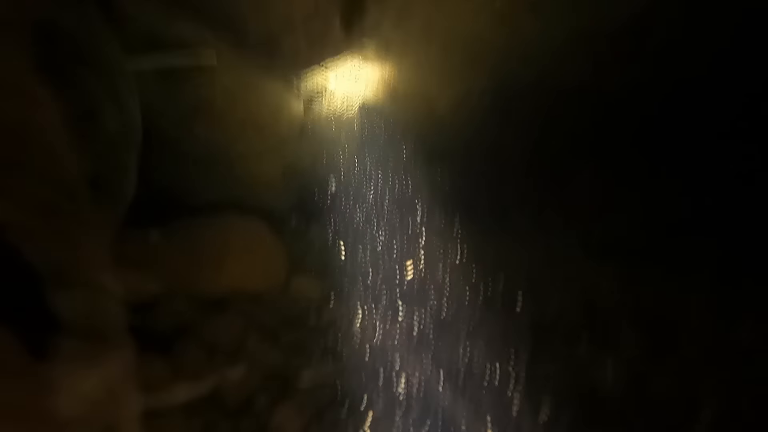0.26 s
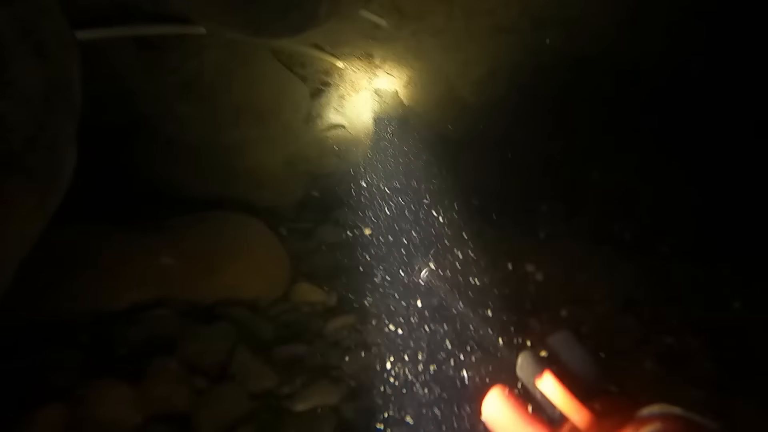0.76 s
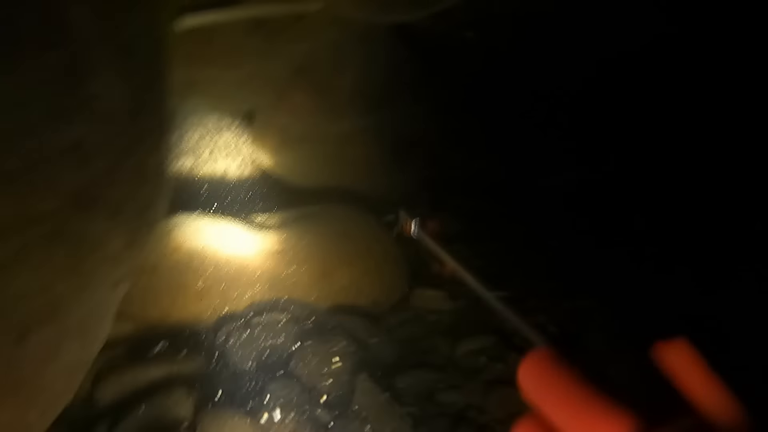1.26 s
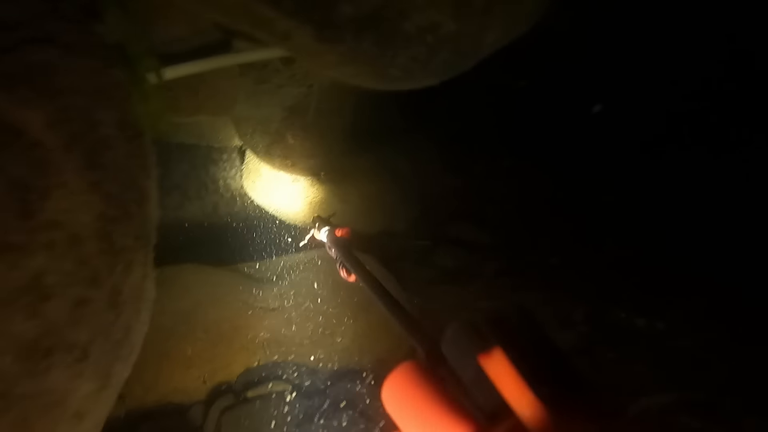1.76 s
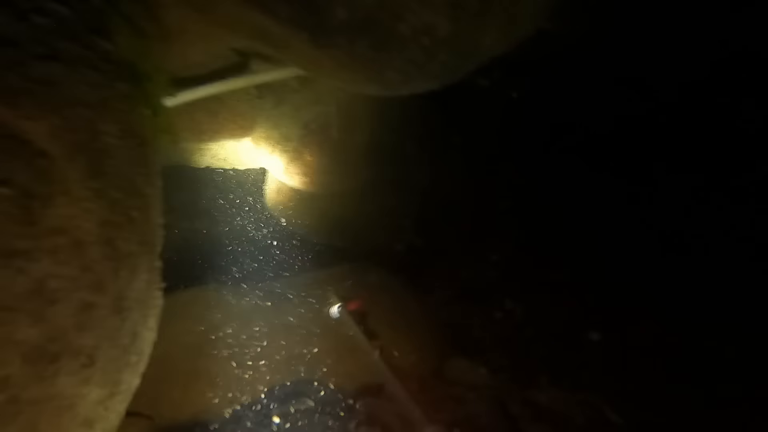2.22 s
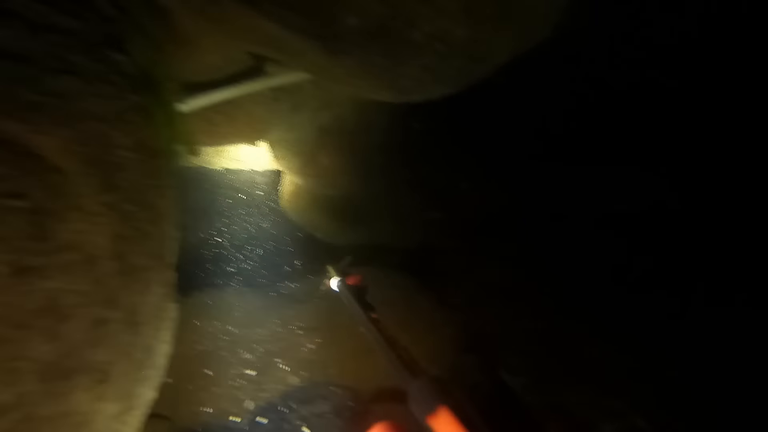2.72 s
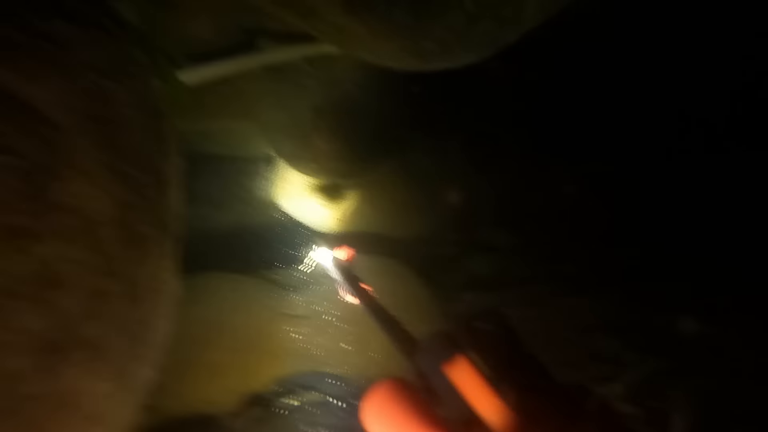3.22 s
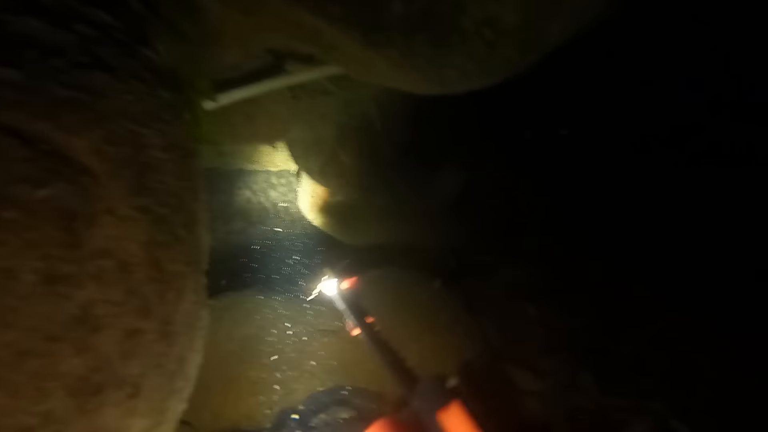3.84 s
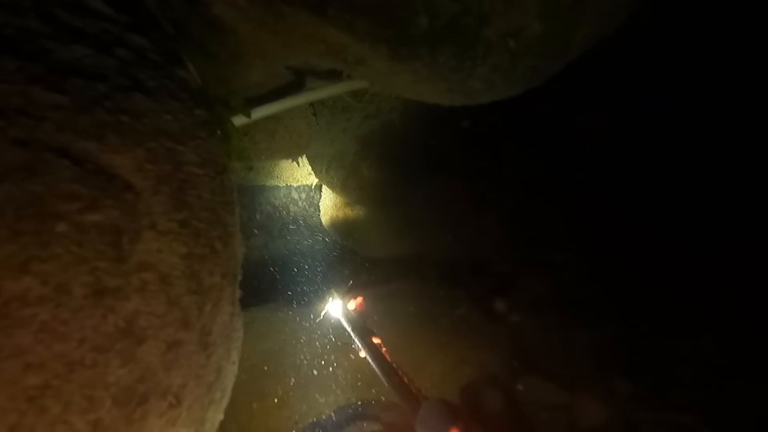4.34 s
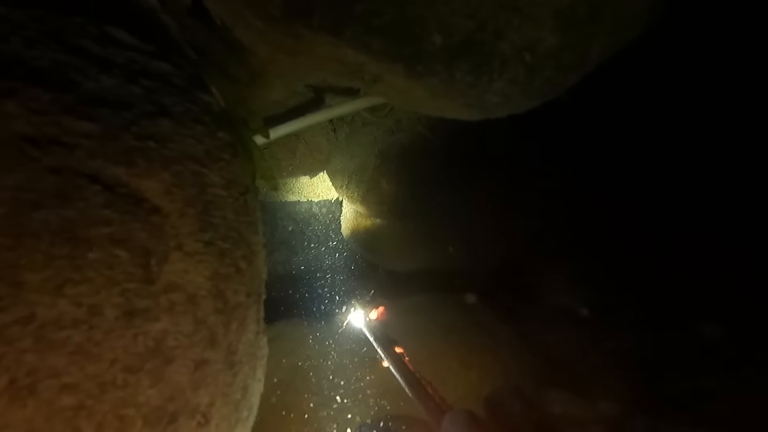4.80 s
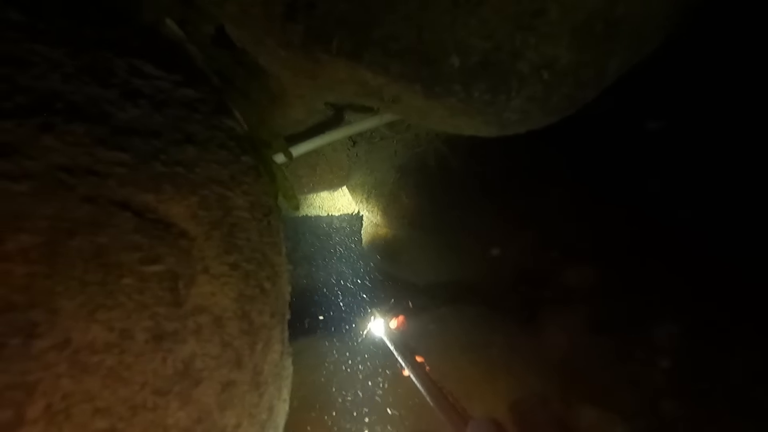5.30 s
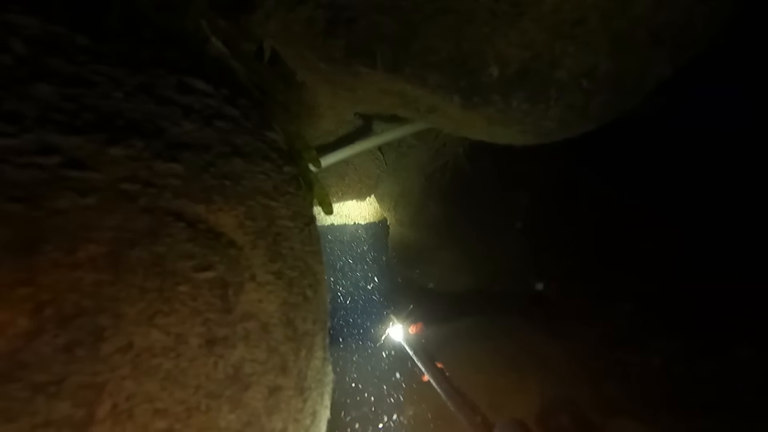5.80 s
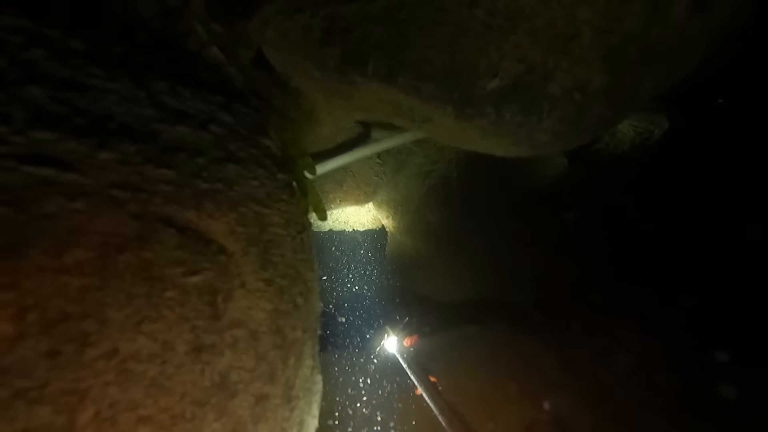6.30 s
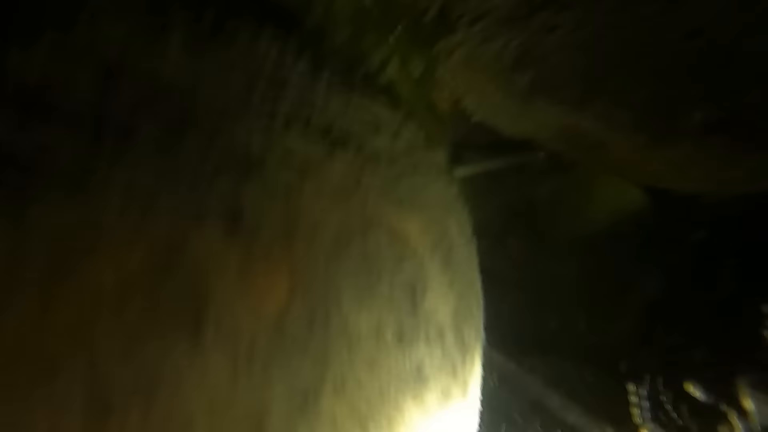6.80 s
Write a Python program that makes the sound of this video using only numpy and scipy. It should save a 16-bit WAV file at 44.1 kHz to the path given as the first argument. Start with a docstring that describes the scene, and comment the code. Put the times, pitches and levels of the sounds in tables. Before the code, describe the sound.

A sealed camera bumps among river boulders underwater: deep surges, thuds and clicks, a quiet stretch with thin high whine, then a loud closing knock.

```python
"""A river current heaves on a sealed camera housing among boulders: a deep rumble, with buffeting, slosh,
gurgle and swish, all made from coloured noise whose level follows tables of moments.
Knocks, grit ticks and a creaking strap are short rough contacts that set the case ringing at a few pitches.
Behind them the camera's circuits whine faintly as wobbling sine tones, over a trace of amplifier hiss."""
import sys
import numpy as np
from scipy import signal
from scipy.fft import rfft, irfft
from scipy.io import wavfile
from scipy.ndimage import uniform_filter1d

SR = 44100
rng = np.random.default_rng(int(sys.argv[2]) if len(sys.argv) > 2 else 0)


def int16_out(signal):
    """Quantize to a 16-bit WAV file."""
    q = np.round(np.clip(np.atleast_2d(signal).T, -1, 1) * 32767)
    wavfile.write(sys.argv[1], SR, q.astype(np.int16))


N = 311257  # length in samples

# All levels in the tables are those before record() drives the mix.

# How hard the river pushes over time: start_s, heave_db, buffet_db, slosh_db
CURRENT = [(0.0, -12, -26.5, -33.5), (0.21, -45, -24.5, -46), (0.31, -15, -32, -32.5),
           (0.43, -40.5, -35.5, -47.5), (0.76, -38.5, -36, -50), (1.16, -24, -30.5, -32.5),
           (2.0, -32.5, -34.5, -49), (2.37, -28, -40.5, -42.5), (2.87, -27.5, -28, -41.5),
           (3.08, -24.5, -30.5, -43), (3.53, -22, -31.5, -41), (3.98, -34, -41.5, -49),
           (4.24, -25.5, -39, -41), (4.55, -30, -43.5, -44), (6.24, -26, -42.5, -44.5),
           (6.77, -30.5, -39.5, -42.5), (6.81, -16.5, -25, -33.5), (7.05, -46, -48.5, -44)]
# Colour of the deep heave: pitch_hz, relative_level_db
HEAVE_COLOUR = [(4.7, -44), (8.0, -6.5), (26, -3), (50, -6), (65, -47), (110, -120)]


def heave():
    """The slow push of the current on the case, heard as a deep rumble."""
    return water(HEAVE_COLOUR, along(CURRENT, 1), size=4096, patchy_db=0, flicker_db=0)


# Colour of the quicker buffeting: pitch_hz, relative_level_db
BUFFET_COLOUR = [(26, -44.5), (45, -4.5), (94, 9), (160, -21.5), (210, -45.5), (350, -120)]
PUSHED_BUFFET_DB = -21  # added to the stir of the surges


def buffet(pushed):
    """Quicker pushes of the current, stronger around each surge."""
    level_db = summed(along(CURRENT, 2), pushed + PUSHED_BUFFET_DB)
    return water(BUFFET_COLOUR, level_db, size=2048, patchy_db=-0.66, flicker_db=2.5)


# Colour of the slosh: pitch_hz, relative_level_db
SLOSH_COLOUR = [(82, -32.5), (140, 9), (249, -8.5), (312, 2.5), (403, -6), (485, -0.5), (545, -7),
                (680, -5.5), (760, -19), (950, -20.5), (1240, -55), (2090, -120)]
STIRRED_SLOSH_DB = -22.5  # added to the stir of the knocks


def slosh(stirred):
    """Water washing round the case with the current, the knocks and the scrapes."""
    level_db = summed(along(CURRENT, 3), stirred + STIRRED_SLOSH_DB, scrapes(column=4))
    return water(SLOSH_COLOUR, level_db, size=1024, patchy_db=1.5, flicker_db=3.0)


GURGLE_UNDER_SLOSH_DB, STIRRED_GURGLE_DB = -19, -50.5


def gurgle_db(stirred):
    """The gurgle follows the current's slosh, the knocks and the scrapes."""
    return summed(along(CURRENT, 3) + GURGLE_UNDER_SLOSH_DB, stirred + STIRRED_GURGLE_DB, scrapes(column=3))


# Colour of the gurgle: pitch_hz, relative_level_db
GURGLE_COLOUR = [(530, -29.5), (900, 2), (994, -6.5), (1350, -1), (1530, -0.5), (2100, -18), (2730, -35),
                 (4620, -120)]


def gurgle(stirred):
    """Water gurgling in the middle pitches, as patchy noise."""
    return water(GURGLE_COLOUR, gurgle_db(stirred), size=512, patchy_db=2.8, flicker_db=2.0)


# Colour of the swish: pitch_hz, relative_level_db
SWISH_COLOUR = [(1180, -37.5), (2000, 1), (2540, 3.5), (3080, -7.5), (4840, -3), (5420, -9), (6360, -12.5),
                (8750, -27.5), (9610, -20), (9800, -24.5), (12700, -45), (21600, -120)]
# The calm swish has SWISH_DB when the whine is at WHINE_FULL_DB, and fades with it by a share.
SWISH_DB, SWISH_SHARE, WHINE_FULL_DB = -64, 0.58, -64
STIRRED_SWISH_DB = -61


def swish(stirred):
    """The bright hiss of moving water and dragged grit."""
    calm_db = SWISH_DB + SWISH_SHARE * (along(WHINE, 2) - WHINE_FULL_DB)
    level_db = summed(calm_db, stirred + STIRRED_SWISH_DB, scrapes(column=2))
    return water(SWISH_COLOUR, level_db, size=256, patchy_db=2.5, flicker_db=1.2)


# Grit and water dragged along the case: middle_s, length_s, swish_db, gurgle_db, slosh_db
# (each end of the length lies 20 dB below the middle)
SCRAPES = [(0.188, .1, -70, -55.5, -28.5), (0.345, 0.052, -51, -32.5, -28.5), (.49, .06, -67, -54.5, -26),
           (0.553, 0.092, -67, -53, -33), (0.767, 0.15, -71, -61.5, -34), (1.068, .06, -62, -51, -30),
           (1.193, 0.17, -67.5, -51.5, -34), (1.355, 0.26, -58, -59.5, -37), (1.447, .06, -66, -51, -25.5),
           (1.691, 0.11, -63, -52, -29.5), (2.097, .1, -82, -58.5, -44.5), (2.319, 0.12, -75, -53.5, -35),
           (2.688, 0.077, -77, -60, -39), (2.87, 0.095, -69, -56, -29), (2.997, 0.11, -57.5, -53, -35),
           (3.23, 0.061, -63, -69.5, -58), (3.448, 0.089, -64.5, -55, -30), (3.988, 0.055, -61, -56, -40),
           (4.66, 0.06, -66, -60, -41), (6.723, 0.043, -66, -54, -37.5), (6.817, 0.066, -42, -35, -19),
           (6.925, 0.086, -60, -44.5, -31)]


def scrapes(column):
    """Level over time of the drags: each one swells and fades like a bell curve."""
    t = np.arange(N) / SR
    return summed(*(row[column] - 20 * ((t - row[0]) / row[1] * 2) ** 2 for row in SCRAPES))


# Each bump's stir rises 60 dB over SWELL_S, then falls 60 dB over SETTLE_S plus a multiple of its t60.
STIR_SHARE, SWELL_S, SETTLE_S, SETTLE_TIMES = 0.55, 0.013, 0.029, 3.3


def stir(bumps):
    """How far bumps (start_s, level_db, t60_s) stir the water round the case, in dB."""
    t = np.arange(0, N + 64, 64) / SR  # coarse steps are enough
    fades = []
    for s, db, t60 in bumps:
        settle_s = SETTLE_S + SETTLE_TIMES * t60
        fades.append(STIR_SHARE * db - 60 * np.maximum((s - t) / SWELL_S, (t - s) / settle_s))
    return np.interp(np.arange(N) / SR, t, summed(*fades))


def water(colour, level_db, size, patchy_db, flicker_db):
    """Coloured noise with drifting patches and a flicker shared by all pitches."""
    frames, hz = 4 * N // size + 5, np.fft.rfftfreq(size, 1 / SR)
    a, b, c, d, patches = rng.standard_normal((frames, len(hz), 5)).T
    patches = uniform_filter1d(patches, size=5, axis=0)  # blur over pitch
    patches = evened(uniform_filter1d(patches, size=6, axis=1))  # blur over time
    flicker = evened(uniform_filter1d(rng.standard_normal(frames), size=3))
    shape_db = read(colour, hz)[:, None] + patchy_db * patches + flicker_db * flicker
    spectra = np.array([a + 1j * b, c + 1j * d]) * gain_of(shape_db)
    one, other = signal.istft(spectra, nperseg=size, noverlap=3 * size // 4)[1][:, :N]
    return gain_of(level_db) * evened(ports(one, other))


# Surges that push on the case: start_s, level_db, pitch_hz, t60_s
THUMPS = [(0.071, -14.5, 117.6, 0.24), (0.26, -4, 46.6, 0.25), (0.791, -8, 83.7, 0.06),
          (0.884, -13, 98.4, 0.059), (1.01, -5.5, 75.6, 0.12), (1.074, -7.5, 70, 0.19),
          (1.266, -5, 97, 0.076), (1.322, -6.5, 90.4, .09), (1.539, -13, 66.1, 0.19),
          (1.655, -8.5, 93.5, 0.1), (1.799, -12, 73.6, 0.11), (1.888, -27, 108, 0.18),
          (2.147, -10, 85.5, 0.083), (2.301, -11.5, 66.2, 0.11), (2.459, -6.5, 75.5, 0.14),
          (2.681, -19.5, 88.2, 0.15), (2.92, -17, 89.4, 0.21), (3.358, -31, 68, 0.45),
          (3.694, -3, 60.4, 0.1), (4.157, -8, 109.2, 0.081), (4.228, -9.5, 73.7, 0.064),
          (4.298, -9, 62.5, 0.12), (6.662, -16, 147.4, 0.089), (6.8, 0.5, 73.7, 0.091)]


def thumps():
    """Each surge of water is one low, softly started, dying tone."""
    out = np.zeros(N)
    for s, db, hz, t60 in THUMPS:
        add(out, s, gain_of(db) * ring(hz, t60, rise=0.27))
    return out


# The pitches at which the case rings: pitch_hz, level_db, t60_s (time to die by 60 dB)
CASE = [(178, -0.5, 0.023), (299.2, -0.5, 0.067), (497, 0.5, 0.046), (658, 1, 0.048), (914, 0, 0.026),
        (1430, 3, 0.01), (1843, 2, 0.011), (2220, 1, 0.007), (3160, 2, 0.0063), (4030, 1, 0.014),
        (4820, 1.5, 0.0083), (6040, -10, 0.0097), (8050, -22, 0.0069)]
# Bumps on the case: start_s, level_db, pitch_hz of the extra ring at the spot struck,
# rap_db (how far the contact shakes pitches near 1500 Hz), contact_t60_s
KNOCKS = [(0.058, -9, 642, -20.5, 0.013), (0.073, -8, 605, -15.5, 0.1), (0.146, -10.5, 330, -19, 0.16),
          (0.17, -20, 325, -32.5, 0.11), (0.201, -17.5, 439, -19.5, 0.03), (0.303, -8.5, 346.5, -22, 0.02),
          (0.373, -9.5, 538, -10, 0.04), (0.378, -18.5, 178, -28, 0.012), (0.466, -12, 350, -9, 0.096),
          (0.543, -20.5, 253.4, -16.5, 0.013), (0.649, -32, 314, -10.5, 0.058),
          (0.672, -25.5, 645, -10.5, 0.16), (0.762, -25, 334, -20, 0.098), (0.892, -20, 255, -21.5, 0.31),
          (0.922, -18.5, 295, -15, 0.037), (1.018, -8.5, 532, -23, 0.11), (1.07, -6.5, 527, -24, 0.072),
          (1.087, -9.5, 322, -20.5, 0.014), (1.129, -12.5, 351, -22.5, 0.084),
          (1.223, -16.5, 364, -5.5, 0.047), (1.273, -11.5, 168, -18, 0.08), (1.284, -10, 327, -24.5, 0.058),
          (1.42, -17.5, 355, -12.5, 0.11), (1.436, -17.5, 329, -35, 0.061),
          (1.529, -17, 242.6, -13.5, 0.22), (1.663, -10.5, 236.5, -37, 0.037),
          (1.802, -30, 512, -27, 0.046), (1.89, -19.5, 653, -25.5, 0.056), (2.154, -31, 313, -29, 0.049),
          (2.303, -27.5, 667, -17, 0.18), (2.34, -22.5, 562, -20.5, 0.038), (2.47, -25, 216, -47, 0.069),
          (2.59, -12, 298, -27.5, 0.13), (2.768, -28.5, 250, -28, 0.044), (2.857, -24.5, 382, -24.5, 0.19),
          (2.923, -8, 257, -25, 0.096), (2.942, -14, 313, -14, 0.099), (2.986, -15.5, 341, -16, 0.025),
          (3.129, -24.5, 310, -32, 0.096), (3.262, -19, 587, -44.5, 0.03), (3.4, -17, 237.4, -62, 0.15),
          (3.449, -19, 298, -17.5, 0.037), (3.506, -27.5, 318, -12, 0.12),
          (3.644, -13, 344.5, -65.5, 0.025), (3.664, -12.5, 346, -40, 0.021),
          (3.696, -5, 340, -49.5, 0.014), (3.82, -18, 364, -34.5, 0.013), (4.095, -30, 300, -13.5, 0.36),
          (4.163, -20, 343, -36, 0.036), (4.239, -29.5, 524, -31, 0.028), (4.635, -27.5, 197, -22, 0.11),
          (5.301, -33.5, 197.4, -30, 0.098), (6.195, -37.5, 500, -42, 0.02),
          (6.671, -17, 206, -48.5, 0.013), (6.775, -3.5, 232, -22.5, 0.06), (6.791, -12, 362, -10.5, 0.048),
          (6.806, 0, 574, 2, 0.11), (6.827, -3.5, 603, -7, 0.014), (6.872, -2, 227.5, -12, 0.029)]


def knocks():
    """The case bumps dully against rock and gear; the spot that is struck favours one pitch."""
    out = np.zeros(N)
    chances = rng.standard_normal((len(KNOCKS), 4096))
    for (s, db, hz, rap_db, t60), chance in zip(KNOCKS, chances):
        hardness = [(np.clip(hz, 400, 700), -6), (1500, rap_db), (3000, rap_db - 23.5)]
        modes = CASE[:8] + [(hz, 6, .04)]
        add(out, s, gain_of(db) * struck(modes, hardness, t60, chance, blow=1.27, rise=0.66))
    return out


# Clear snaps on the case: start_s, level_db, pitch_hz of the extra ring,
# crack_db (how far the contact shakes pitches near 4500 Hz), contact_t60_s
TICKS = [(0.072, -43.5, 1410, -9, 0.019), (0.1277, -40.5, 1340, -7, 0.01), (0.181, -36.5, 1350, -14, 0.02),
         (0.2334, -41, 1340, -9, 0.009), (0.2925, -31.5, 1850, -18, 0.015), (0.3051, -6, 1617, -9.5, 0.013),
         (0.3362, -12.5, 1875, -7, 0.038), (0.3479, -10, 1664, -9.5, 0.016),
         (0.3715, -14, 1740, -17.5, 0.02), (0.4565, -12.5, 1476, -38, 0.0012),
         (0.549, -39.5, 1370, -17, 0.012), (0.762, -50.5, 1400, -8, 0.01), (0.8112, -46, 1330, -2, 0.0091),
         (0.8955, -33, 1790, -9.5, 0.015), (0.9258, -31, 1400, -43.5, 0.0063),
         (1.0189, -22.5, 1380, -53, 0.0063), (1.053, -40.5, 1520, -26, 0.01), (1.067, -37, 1300, -19, 0.01),
         (1.2218, -29.5, 1450, -42, 0.0067), (1.2711, -30, 1640, -31, 0.0088),
         (1.5295, -37, 1505, -32, 0.012), (1.6642, -29, 1360, -44, 0.019), (1.8042, -31, 2430, -22, 0.012),
         (2.306, -35, 3970, -6, 0.0061), (2.9412, -33, 1310, -31, 0.025), (2.9866, -38, 1340, -22, 0.0062),
         (3.0713, -41.5, 1460, -25, 0.012), (3.696, -28.5, 1480, -27.5, 0.012),
         (3.928, -46, 1560, -37, 0.011), (3.9846, -38, 1620, -15.5, 0.028), (4.156, -41, 1540, -10, 0.009),
         (4.2425, -36.5, 1210, -21, 0.011), (4.261, -42.5, 1580, -10, 0.01),
         (5.2984, -44, 1500, -28, 0.014), (6.7748, -19, 2610, -24, 0.0072),
         (6.8091, -2, 1355, -16.5, 0.0096), (6.874, -13, 1454, -21.5, 0.0097),
         (6.94, -30.5, 1430, -20, 0.063)]


def ticks():
    """Grit and buckles snap on the case: short hard contacts that shake its higher pitches."""
    out = np.zeros(N)
    chances = rng.standard_normal((len(TICKS), 4096))
    for (s, db, hz, crack_db, t60), chance in zip(TICKS, chances):
        hardness = [(700, -24), (1400, -7.0), (2600, -13.5), (4500, crack_db), (9000, crack_db + 8.0)]
        modes = CASE[3:] + [(hz, 5, .012)]
        add(out, s, gain_of(db) * struck(modes, hardness, t60, chance, blow=0.98, rise=0.88))
    return out


# Small metal parts of the gear left ringing: start_s, pitch_hz, level_db, t60_s
PINGS = [(.38, 2970, -67, 0.41), (.38, 3700, -75, .4), (6.941, 4730, -48.5, 0.13), (6.941, 4100, -53, 0.08)]


def pings():
    """Each metal part is a dying tone, faded to silence at its end."""
    out = np.zeros(N)
    for s, hz, db, t60 in PINGS:
        add(out, s, gain_of(db) * ring(hz, t60, rise=1.5) * np.hanning(8192)[4096:])
    return out


def sprinkle(level_db):
    """Small grit ticks at random moments, which grow and fade with the gurgle."""
    out = np.zeros(N)
    size = gain_of(level_db + 3.5 + 4.4 * np.minimum(rng.exponential(1, N), 4))  # a few much louder
    for hz, db, t60 in CASE[4:9]:
        hits = rng.random(N) < 8.0 / SR  # about 8 a second at each pitch
        out += signal.oaconvolve(size * gain_of(db) * hits, ring(hz, t60, rise=0.58))[:N]
    return out


# A strap creaking: start_s, length_s, level_db, pitch_hz of the extra ring
CREAKS = [(4.386, .05, -53, 2040), (4.4265, .025, -49, 2000), (4.4593, .005, -44, 2100),
          (4.475, .036, -39.5, 2050), (4.6399, .036, -35.5, 2050), (4.814, .008, -41, 2060),
          (4.873, .008, -40.5, 2080), (4.962, .02, -46, 2070), (5.0603, .02, -36, 2030)]
# How far a slip shakes each pitch: pitch_hz, level_db
SLIP_HARDNESS = [(700, -14.5), (1400, -4), (2300, 1), (3200, -13), (4500, -23), (6000, -5), (9000, -24)]
SLIP_S, SLIP_T60_S = 0.013, 0.014  # time between slips, and how fast each contact dies


def creaks():
    """The strap sticks and lets go in quick slips, each of which snaps on the case."""
    out = np.zeros(N)
    all_chances = rng.standard_normal((len(CREAKS), 6, 4096))
    for (s, length, db, hz), chances in zip(CREAKS, all_chances):
        modes = CASE[3:] + [(hz, 3, .01)]
        for at, chance in zip(np.arange(s, s + length, SLIP_S), chances):
            snap = struck(modes, SLIP_HARDNESS, SLIP_T60_S, chance, blow=.8, rise=0.81)
            add(out, at, gain_of(db) * snap)
    return out


def ring(hz, t60, rise):
    """A dying tone; water damping lets it start softly, over a share of a cycle."""
    t = np.arange(4096) / SR
    return (1 - np.exp(-t * hz / rise)) ** 2 * gain_of(-60 * t / max(t60, .002)) * np.sin(2 * np.pi * hz * t)


def struck(modes, hardness, t60, chance, blow, rise):
    """A first blow and a rough, dying contact shake each mode as far as the hardness reaches."""
    contact = chance * gain_of(-60 * np.arange(4096) / SR / max(t60, .001))
    contact[0] = blow * np.linalg.norm(contact)
    sound = np.zeros(4096)
    for hz, db, decay in modes:
        shaken = signal.fftconvolve(contact, ring(hz, decay, rise))[:4096]
        sound += gain_of(db + read(hardness, hz)) * shaken / abs(shaken).max()
    return sound / abs(sound).max()


# The circuit tone over time: start_s, pitch_hz, level_db
WHINE = [(.05, 10770, -78), (.15, 10550, -83), (.27, 10900, -75.5), (.42, 10730, -88), (.6, 10620, -87),
         (1.15, 10800, -75), (1.32, 10400, -81), (1.5, 10330, -77), (1.98, 10440, -76.5),
         (2.06, 10600, -75.5), (2.9, 10580, -69.5), (3, 10340, -69), (3.68, 10400, -70.5),
         (3.73, 10350, -75), (3.82, 10470, -72.5), (4.58, 10360, -67.5), (4.66, 10430, -68.5),
         (5.05, 10450, -65), (5.14, 10310, -64.5), (6.52, 10220, -66), (6.75, 10600, -63),
         (6.82, 10300, -80.5), (7.05, 10700, -99)]
# Tones that move with it: offset_hz, direction (1 along, -1 against), level_db against the whine
PARTNERS = [(0, 1, 0), (24000, -1, -17), (3900, 1, -17), (-3900, 1, -12)]
FRAME_HZ = 60  # picture frames a second


def whine():
    """A thin circuit tone and its partners, wobbling with every picture frame and wandering a little."""
    frame = 2 * np.pi * FRAME_HZ * np.arange(N) / SR
    wobble = np.sin(frame) + 0.53 * np.sin(2 * frame + 1.1) + .3 * np.sin(3 * frame + 2.1)
    waver = evened(uniform_filter1d(rng.standard_normal(N), size=300))
    wander = evened(uniform_filter1d(rng.standard_normal(N), size=3000))  # slower
    hz = along(WHINE, 1) + 110.0 * wobble + 25. * waver + 20. * wander
    tones = np.zeros(N)
    for offset, way, db in PARTNERS:
        tones += gain_of(db) * np.sin(2 * np.pi * np.cumsum(offset + way * hz) / SR)
    left_right = gain_of([[1.2], [-1.2]])
    return gain_of(along(WHINE, 2)) * (1 + 0.25 * wobble) * tones * left_right


# How alike left and right are: pitch_hz, likeness (0 to 1)
SAME = [(60, 1), (180, 1), (550, 0.96), (1650, 0.55), (3000, 0.33), (4970, 0.86), (9000, 0.89),
        (15000, 0.99)]
# How far left runs ahead of right: pitch_hz, lead_radians
LEAD = [(100, 0), (520, .3), (860, -.5), (1460, .1), (2500, -.8), (4300, 0)]
# How much louder left is than right: pitch_hz, balance_db
TILT = [(60, -0.5), (180, -0.5), (550, 0.5), (1650, 1.5), (4970, -1), (15000, 3)]


def ports(x, apart):
    """One sound at two microphone ports: partly alike, with a lead and a balance that depend on pitch."""
    hz = np.fft.rfftfreq(N, 1 / SR)
    same = np.clip(read(SAME, hz), 0, 1)
    half = gain_of(read(TILT, hz) / 2) * np.exp(.5j * read(LEAD, hz))  # each side takes half
    a, b = rfft(x), rfft(apart)
    return irfft([a * half, (same * a + np.sqrt(1 - same ** 2) * b) / half], N)


def gain_of(db):
    """Decibels to a plain multiplier."""
    return 10 ** (np.asarray(db) / 20)


def evened(x):
    """Scale to an average (rms) strength of one."""
    return x / np.sqrt(np.mean(x ** 2) + 1e-20)


def summed(*levels_db):
    """Level in dB of several noises together: their powers add."""
    return 10 * np.log10(sum(gain_of(db) ** 2 for db in levels_db) + 1e-20)


def read(points, hz):
    """Read a curve of (pitch_hz, value) points, joined on a log pitch scale."""
    f, value = np.transpose(points)
    return np.interp(np.log(hz + 1), np.log(f + 1), value)


def along(table, column):
    """One column of a timed table, joined by straight lines over the whole length."""
    rows = np.array(table)
    return np.interp(np.arange(N) / SR, rows[:, 0], rows[:, column])


def add(mix, s, sound):
    """Add a sound into the mix from second s on."""
    part = mix[..., round(s * SR):][..., :len(sound)]
    part += sound[:part.shape[-1]]


def scene():
    """The moving water, the blows on the case and the whine, at two ports."""
    stirred = stir([(s, db, t60) for s, db, _, _, t60 in KNOCKS])
    pushed = stir([(s, db, t60) for s, db, _, t60 in THUMPS])
    river = heave() + buffet(pushed) + slosh(stirred) + gurgle(stirred) + swish(stirred)
    blows = thumps() + knocks() + ticks() + pings() + sprinkle(gurgle_db(stirred)) + creaks()
    # What strikes the case differs between the ports mostly in phase.
    blows = ports(blows, signal.hilbert(blows).imag)
    return river + blows + whine()


CEILING, HISS_DB, EDGE_HZ = .98, -99, 15700  # overload limit, hiss before the band limit, top pitch


def record(dry):
    """Soft overload on the hardest blows, a trace of amplifier hiss, then the band limit."""
    loud = CEILING * np.tanh(1.184 * dry / CEILING)
    hissing = loud + gain_of(HISS_DB) * rng.standard_normal(N)  # the same hiss on both sides
    low_pass = signal.firwin(511, EDGE_HZ, window=("kaiser", 9), fs=SR)
    return signal.oaconvolve(hissing, low_pass[None], "same")


dry = scene()
out = record(dry)
int16_out(out)
```